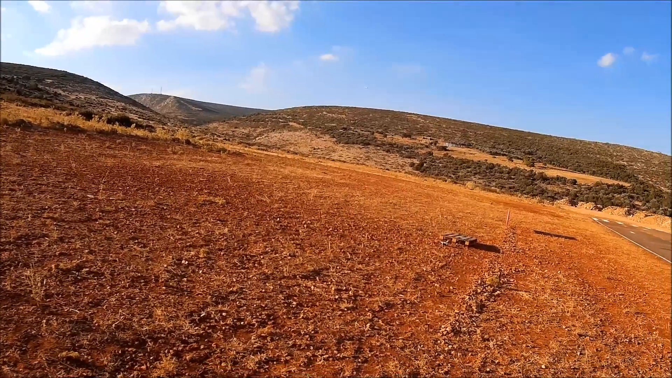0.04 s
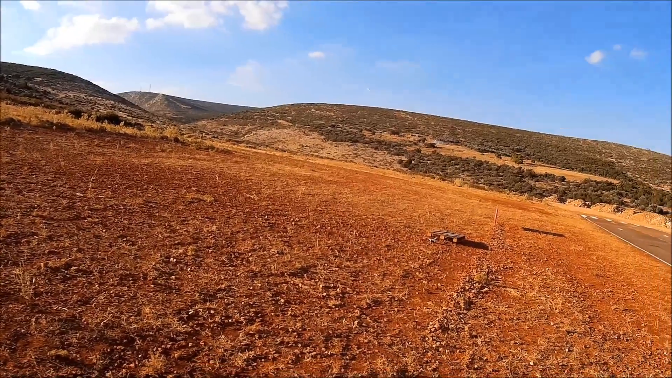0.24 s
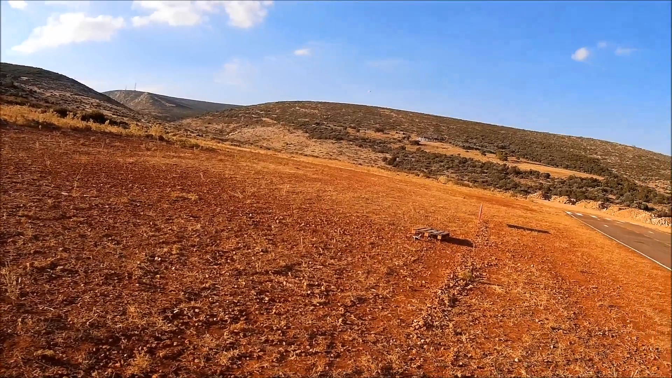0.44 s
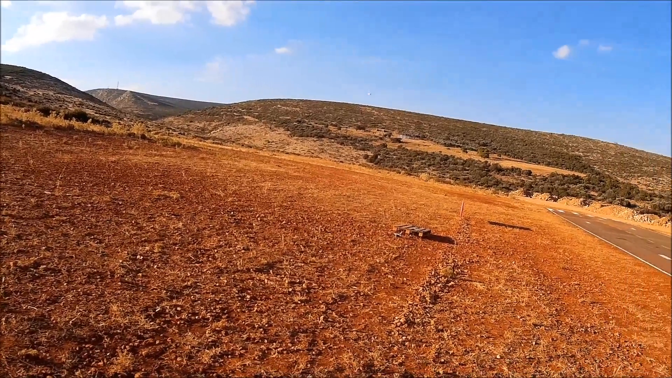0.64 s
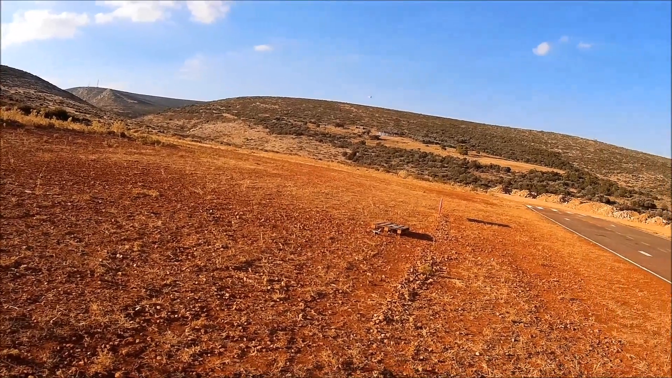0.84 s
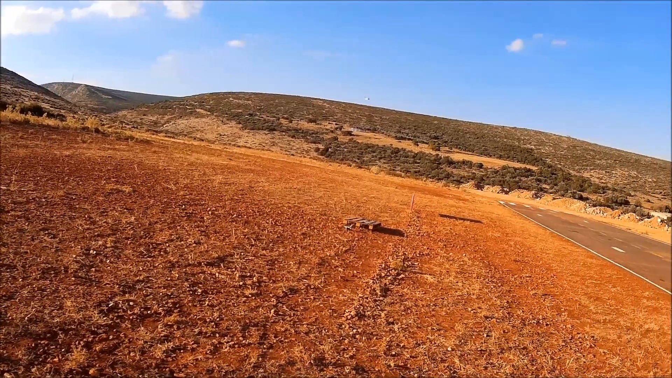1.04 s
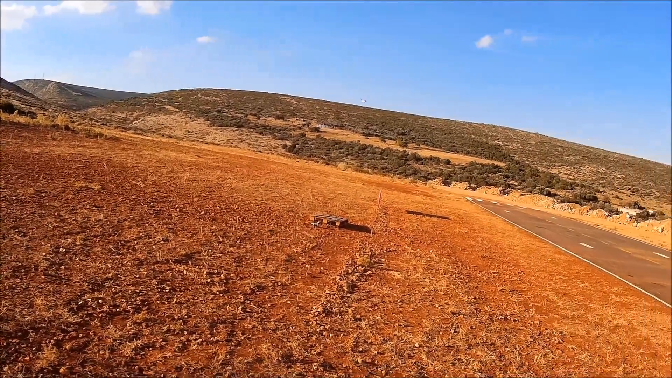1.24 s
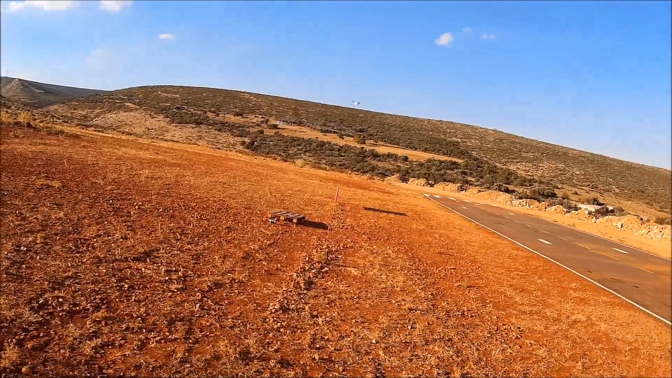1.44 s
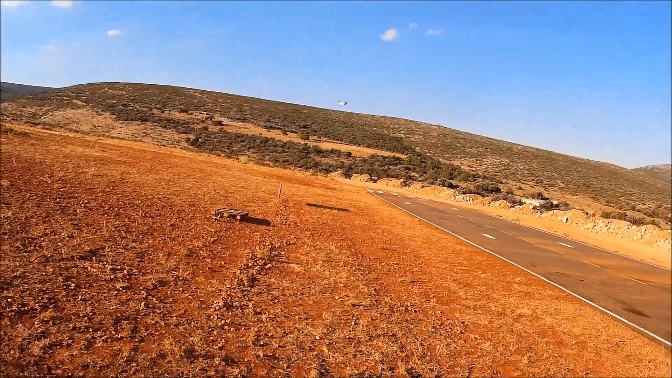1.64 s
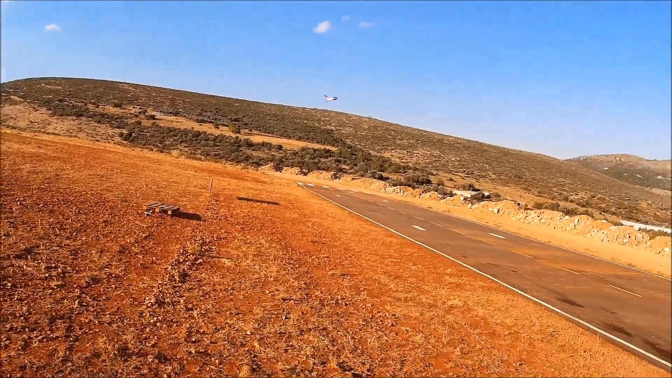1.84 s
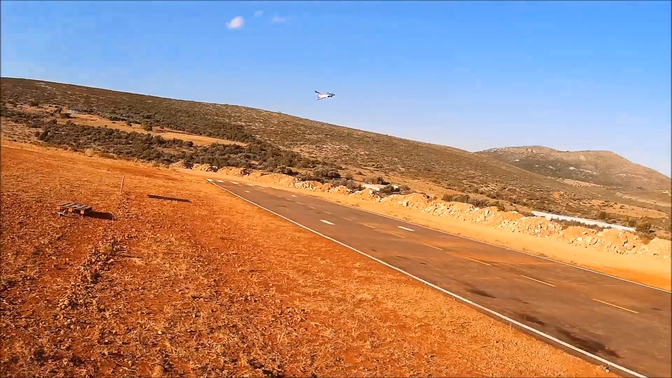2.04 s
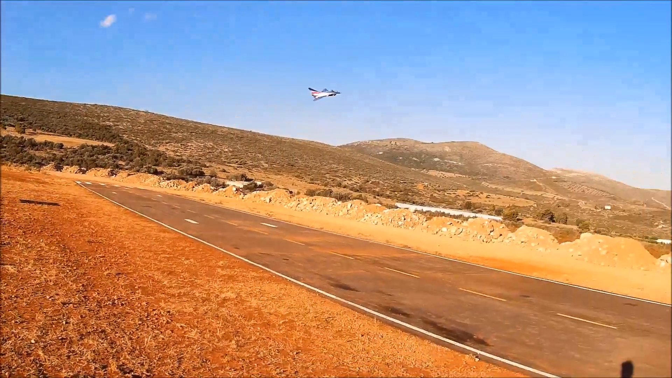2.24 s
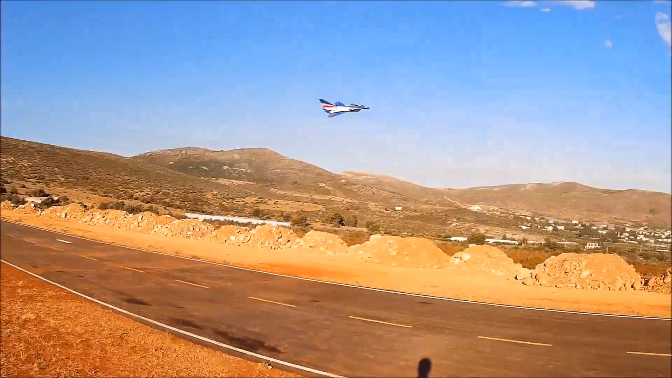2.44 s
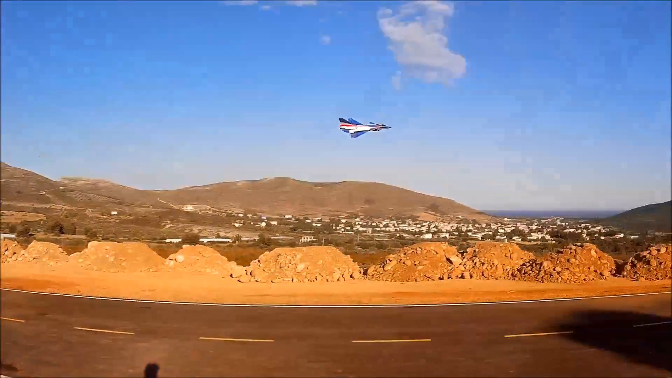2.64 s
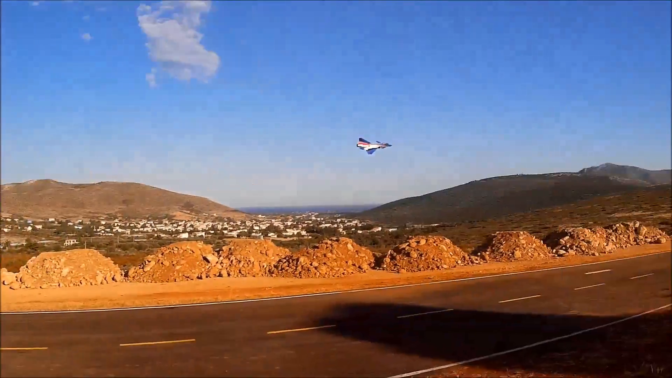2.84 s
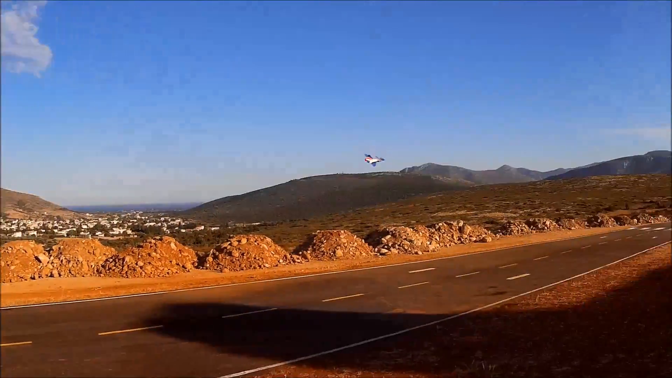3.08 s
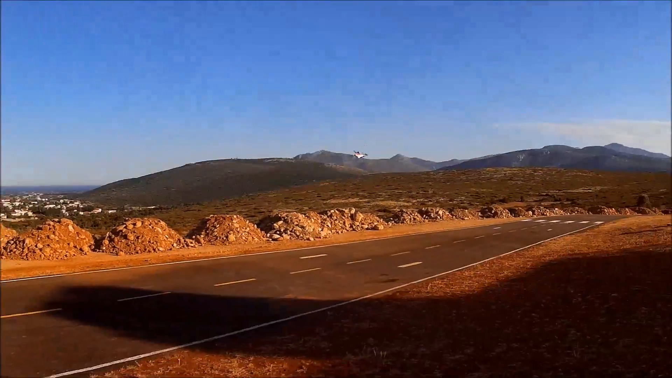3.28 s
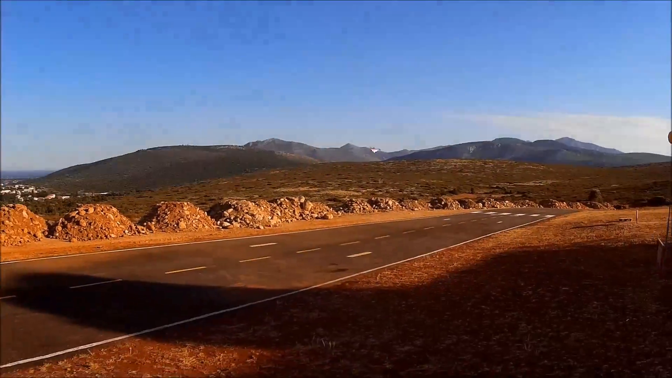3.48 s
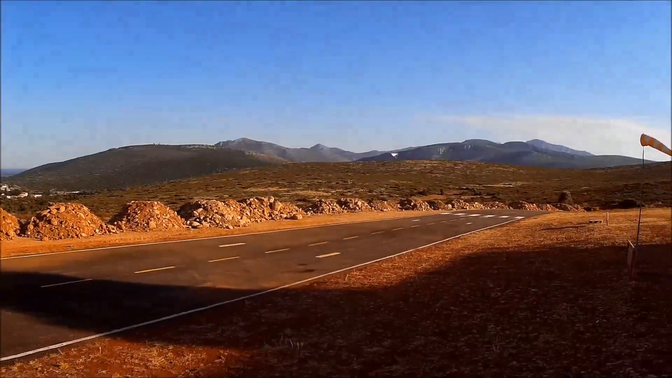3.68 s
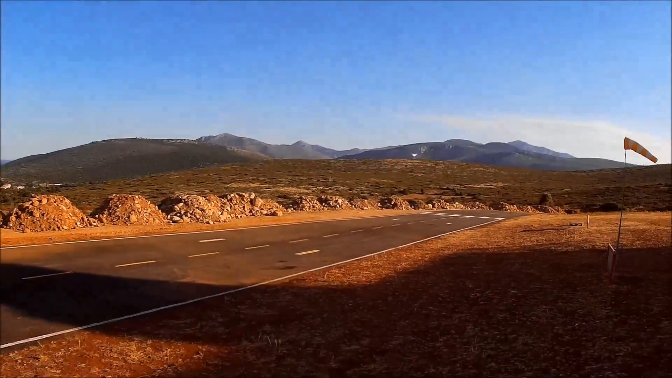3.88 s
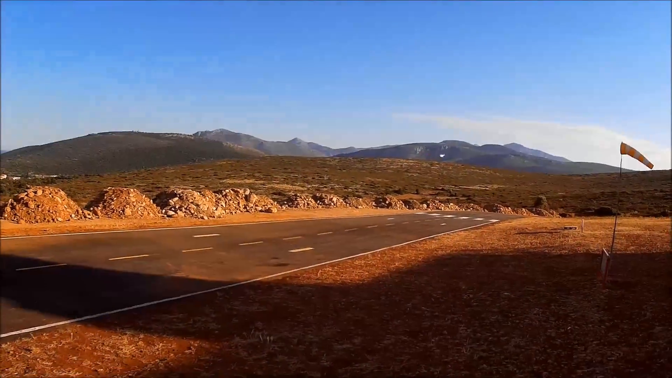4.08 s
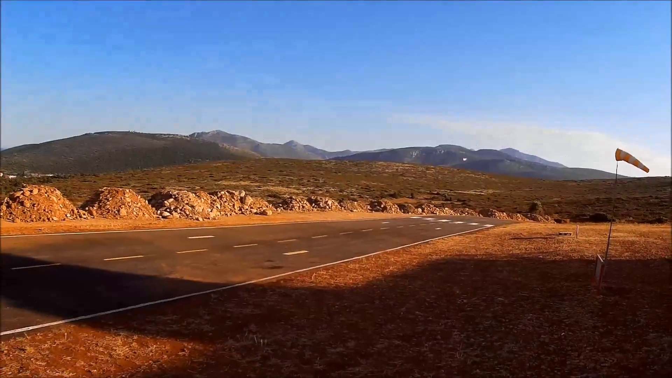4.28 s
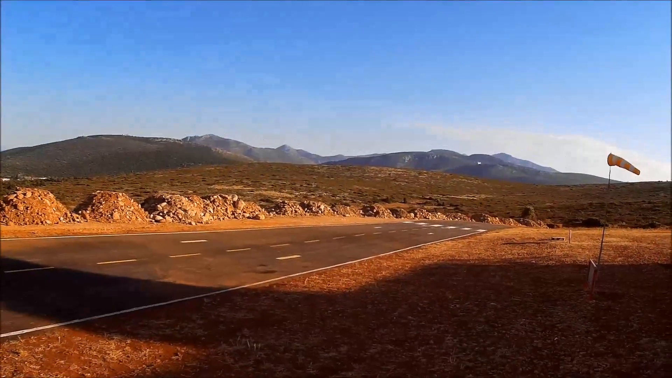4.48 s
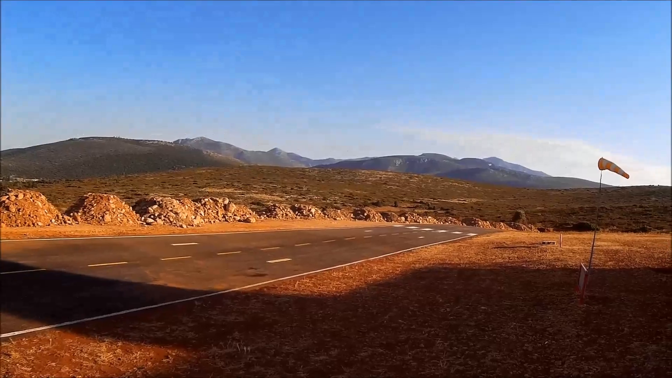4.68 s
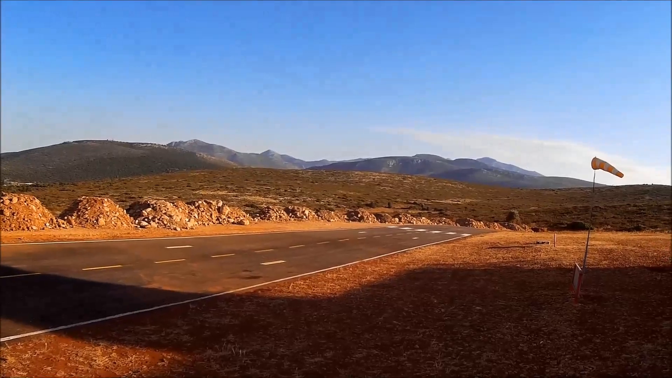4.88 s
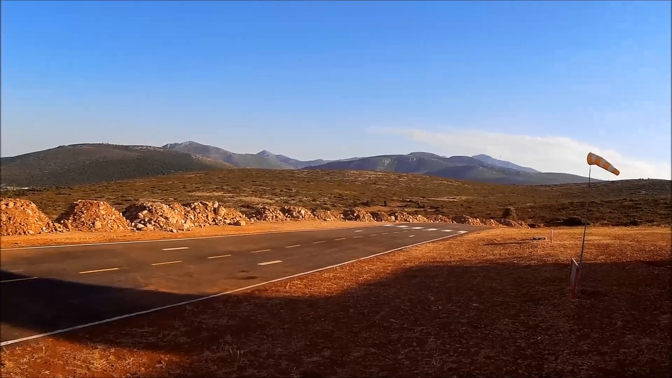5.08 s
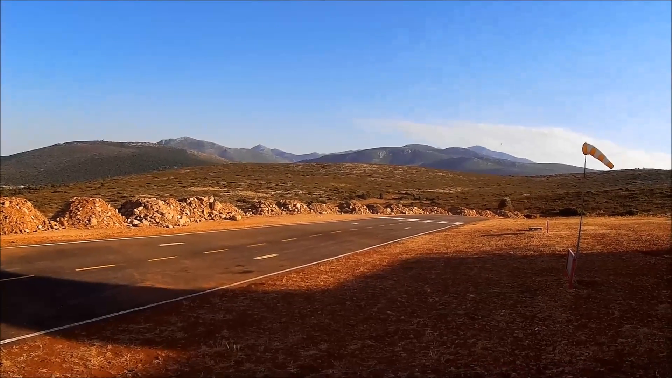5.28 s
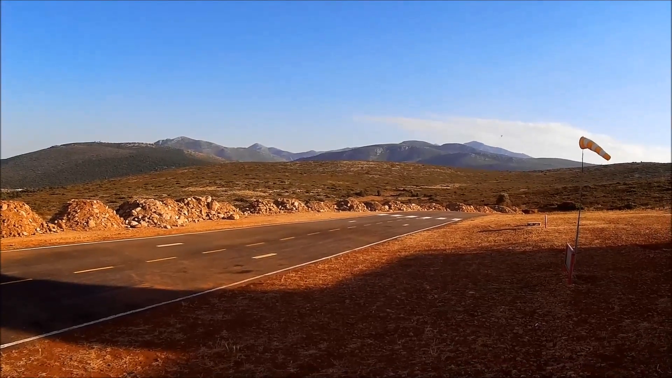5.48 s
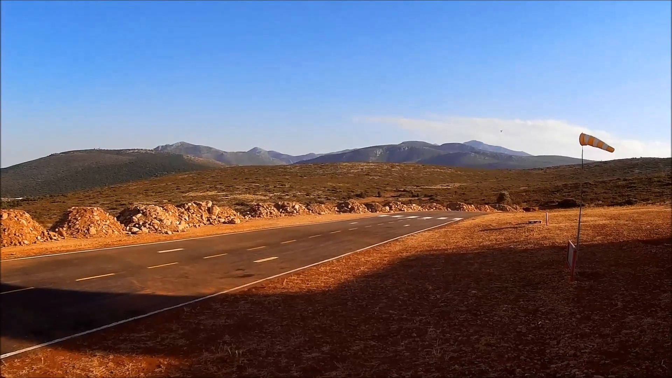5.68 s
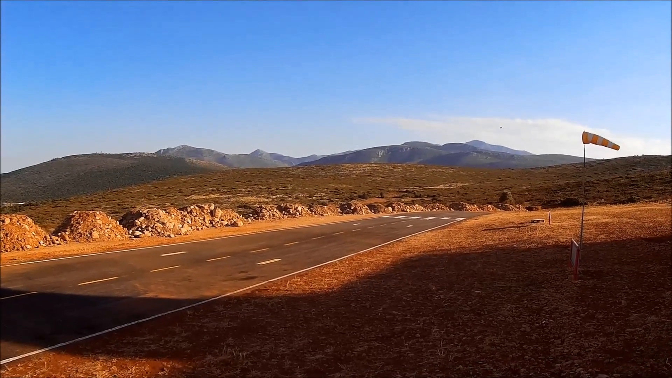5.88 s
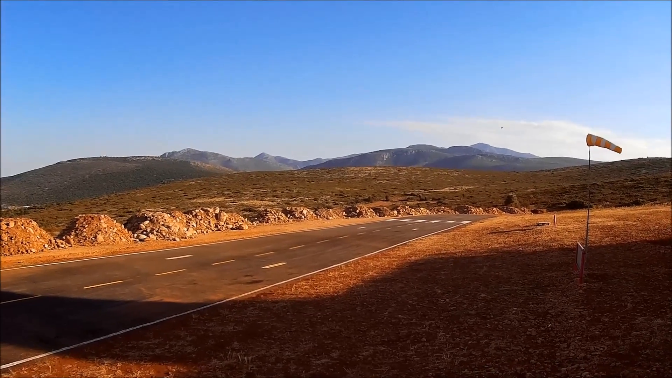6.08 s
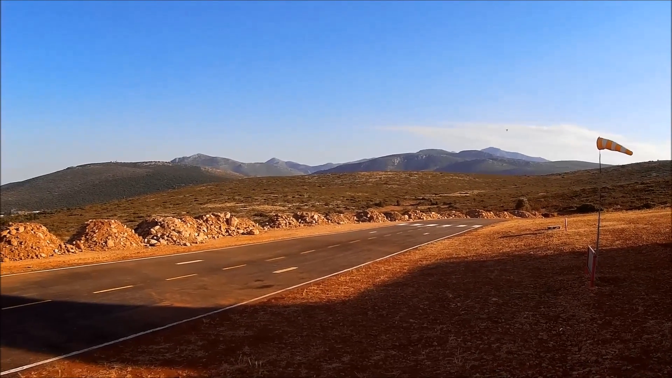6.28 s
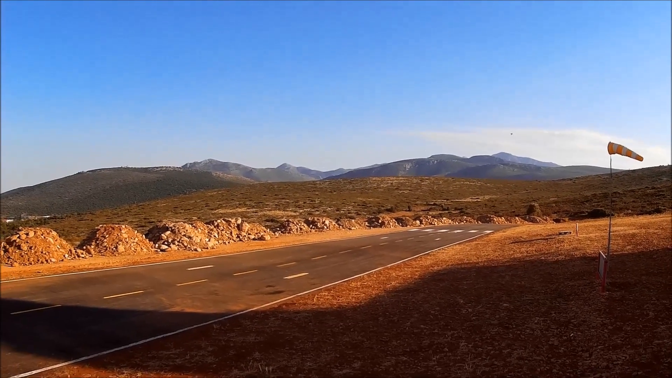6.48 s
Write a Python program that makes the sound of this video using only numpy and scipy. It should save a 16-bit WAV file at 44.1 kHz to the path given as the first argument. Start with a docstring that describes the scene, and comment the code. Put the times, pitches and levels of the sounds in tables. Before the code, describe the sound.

From the start, a model jet with an electric fan is heard approaching over an open airfield: a steady hum and high whine inside a wavering rush of air. The rush grows louder and brighter through the first two seconds. At about 2.6 seconds the jet passes close and low, at its loudest, with a hissing, sweeping whoosh, and the hum and whine drop quickly in pitch. From about 3 seconds it recedes, the treble falling away to leave a duller, throaty rush and a thin, lower whine that waver and are faint by the end, at about 6.5 seconds. Gusts of wind buffet the microphone with a low, uneven rumble, strongest from 2 to 3.4 seconds and returning more lightly afterwards. Small, soft thumps of wind come near 3.4 seconds and between 5.6 and 5.9 seconds. A faint, steady hiss lies underneath.

```python
"""A model jet with an electric fan in a duct makes one fast, low pass over an open airfield.
The spinning fan hums and whines, and its pitch falls as it goes by (the Doppler effect).
The churning exhaust air makes a rushing noise that grows louder and brighter as the jet nears.
An echo off the runway mixes with the jet's sound and gives it a sweeping whoosh.
Behind it, gusts of wind buffet the microphone over a faint, steady hiss."""
import sys
import numpy as np
from scipy import signal
from scipy.fft import rfft, irfft, next_fast_len
from scipy.io import wavfile
from scipy.ndimage import uniform_filter1d, map_coordinates

SR = 44100
rng = np.random.default_rng(int(sys.argv[2]) if len(sys.argv) > 2 else 0)


def output_pcm(signal):
    """Save a mono or channel-first signal as 16-bit PCM at the path in sys.argv[1].

    Samples are clipped to [-1, 1] before scaling.
    """
    pcm = np.clip(np.atleast_2d(signal).T, -1, 1) * 32767
    wavfile.write(sys.argv[1], SR, np.round(pcm).astype(np.int16))


N = 287708
TIME = np.arange(N) / SR
SOUND_M_PER_S = 343


def from_db(db):
    """Turns decibels into a factor to multiply a sound by."""
    return 10 ** (np.asarray(db) / 20)


def unit_level(x):
    """Scales a signal to an average (rms) size of 1."""
    return x / np.sqrt(np.mean(x ** 2) + 1e-20)


def look_up(rows, at):
    """Reads a table at the given times or angles, joining its rows with straight lines."""
    marks, *columns = np.transpose(rows)
    return [np.interp(at, marks, column) for column in columns]


def drift(rate):
    """A smooth random wobble of size about 1; a higher rate wobbles faster."""
    step, warm_up = 40, 2000
    pole = np.exp(-2 * np.pi * step * rate / SR)
    white = rng.standard_normal(N // step + warm_up + 2)
    slow = signal.lfilter([1], [1, -2 * pole, pole * pole], white)[warm_up:]
    return np.interp(np.arange(N) / step, np.arange(len(slow)), unit_level(slow))


def noise(spectrum, patchy_db=0.0, rate=1.0, bands=1):
    """Noise of size 1, shaped by a table from bass to treble; each band swells and fades on its own."""
    hz, db = np.transpose(spectrum)
    size = next_fast_len(N)
    log_hz, marks = np.log(np.arange(size // 2 + 1) * SR / size + 1e-9), np.log(hz)
    shape = from_db(np.interp(log_hz, marks, db, left=-200, right=-200))
    bins = rfft(rng.standard_normal(size)) * shape
    place = np.interp(log_hz, [marks[0], marks[-1]], [0, bands - 1])
    parts = (irfft(bins * np.maximum(1 - abs(place - k), 0), size)[:N] for k in range(bands))
    return unit_level(sum(part * from_db(patchy_db * drift(rate)) for part in parts))


# The tone of the quiet background: f/Hz, relative level/dB
STILL_AIR_SPECTRUM = [(30, -3), (200, -9.5), (600, -7), (1500, -13.5), (2100, -22), (2900, -23),
                      (4000, -25), (6000, -26), (7500, -31), (14000, -35.5), (16000, -31)]

def still_air(level_db=-53.5):
    """Still air and the microphone's own hiss make a faint, steady noise."""
    return from_db(level_db) * noise(STILL_AIR_SPECTRUM)


# Single hard puffs of wind: t/s, relative peak level/dB
PUFFS = [(3.334, -24), (3.381, -20), (5.3, -29), (5.602, -24), (5.642, -21), (5.673, -19), (5.686, -18),
         (5.787, -25), (5.845, -21.5), (6.429, -23.5)]

def puffs(typical_width_s=0.0013, gain_db=-10.0):
    """A swirl of air hitting the microphone gives one quick push and pull of pressure."""
    out = np.zeros(N)
    for start, peak_db in PUFFS:
        width_s = typical_width_s * from_db(2 * rng.standard_normal())
        offset = (TIME - start) / width_s - 1
        near = abs(offset) < 6
        out[near] += from_db(peak_db + gain_db) * offset[near] * np.exp((1 - offset[near] ** 2) / 2)
    return out


def gust(start, length, rise_s=0.045, fade_s=0.031):
    """The strength of one gust: it rises quickly, holds and dies away."""
    rise = np.clip((TIME - start) / rise_s + .5, 0, 1)
    return rise * np.exp(-np.maximum(TIME - start - length, 0) / fade_s)


# The tone of the wind's deep rumble and of its higher buffeting: f/Hz, relative level/dB
RUMBLE_SPECTRUM = [(12, -3.5), (25, -0.5), (45, -4), (80, -4), (120, -8), (220, -21)]
BUFFET_SPECTRUM = [(60, -21), (120, -1.5), (160, -0.5), (220, 0), (290, -4), (400, -9.5), (700, -28.5),
                   (1400, -22.5), (3000, -39)]
# The light breeze: t/s, rumble level/dB
BREEZE = [(0, -61), (1.2, -60), (1.4, -51), (4.7, -48), (5.05, -55), (6.52, -50.5)]
# The gusts: start t/s, length/s, rumble level/dB, buffet level/dB
GUSTS = [(0.202, 0.055, -53, -51), (1.274, 0.05, -45, -52), (1.432, 0.23, -43.5, -45),
         (1.72, 0.21, -47, -48), (1.994, 0.876, -40.5, -38), (2.203, 0.21, -35, -31.5),
         (2.692, .04, -31, -32), (2.845, 0.27, -42, -47.5), (3.186, 0.055, -38, -30.5),
         (3.3, .07, -34, -33.5), (4.216, 0.11, -41.5, -47), (4.432, .07, -38.5, -46),
         (4.85, 0.082, -53, -50.5), (5.182, 0.11, -41.5, -49), (5.6, .32, -45.5, -39),
         (5.974, 0.21, -45, -49), (6.27, 0.21, -46.5, -47)]

def wind():
    """The breeze and its gusts make lumpy, low noise as they blow across the microphone."""
    rumble_gain = from_db(look_up(BREEZE, TIME)[0])
    buffet_gain = rumble_gain * from_db(-11)
    for start, length, rumble_db, buffet_db in GUSTS:
        strength = gust(start, length)
        rumble_gain = np.hypot(rumble_gain, from_db(rumble_db) * strength)
        buffet_gain = np.hypot(buffet_gain, from_db(buffet_db) * strength)
    rumble = rumble_gain * noise(RUMBLE_SPECTRUM, patchy_db=2.5, rate=13.0)
    buffet = buffet_gain * noise(BUFFET_SPECTRUM, patchy_db=3.5, rate=25.0)
    return rumble + buffet


# The jet's shallow dive and climb
LOWEST_M, LOWEST_S, PULL_UP_M_PER_S2 = 5.95, 3.0, 2.66
# How much sound bounces back; rough ground scatters the treble: f/Hz, level/dB
GROUND_BOUNCE = [(450, -2.14), (1100, -6), (1900, -14.5), (2500, -8), (3600, -10.5), (5000, -9.5),
                 (6500, -28), (15000, -21)]

def ground_echo(sound, distance, mic_height_m=1.6):
    """The ground returns a late, duller copy. Its changing delay sweeps dips through the mix."""
    height = LOWEST_M + .5 * PULL_UP_M_PER_S2 * (TIME - LOWEST_S) ** 2
    delay_s = 2 * mic_height_m * height / distance / SOUND_M_PER_S
    hz, db = np.transpose(GROUND_BOUNCE)
    log_hz = np.log(np.arange(1, N // 2 + 2) * SR / N)
    dulled = irfft(rfft(sound) * from_db(np.interp(log_hz, np.log(hz), db)), N)
    return map_coordinates(dulled, [(TIME - delay_s) * SR], order=3)


SPEED_M_PER_S, CLOSEST_M, PASS_S = 43.37, 15.7, 2.63
MACH = SPEED_M_PER_S / SOUND_M_PER_S

def flight():
    """Distance (m) and angle (0 degrees nose-on, 180 tail-on) of the jet when the sound left it."""
    along = SPEED_M_PER_S * (TIME - PASS_S)
    distance = (np.sqrt(along ** 2 + (1 - MACH ** 2) * CLOSEST_M ** 2) - MACH * along) / (1 - MACH ** 2)
    return distance, np.degrees(np.arccos(MACH - along / distance))


# Moving air makes the far sound surge and fade: t/s, relative level/dB
AIR_FADING = [(0.03, -4), (0.23, 2.5), (0.33, -5.4), (0.45, 1.5), (0.73, -1), (0.87, 5.5), (1.13, 1.1),
              (1.73, 2.5), (1.79, 0), (2.01, 2), (2.61, -1.04), (2.93, 0.13), (3.63, 0.2), (3.67, -3),
              (4.19, -0.2), (4.79, -8), (5.01, 1), (5.17, -8.2), (5.63, -6.8), (5.73, -0.5), (5.85, -7),
              (6.21, -14), (6.31, -10), (6.47, -12)]

def path_db(distance, fading_share):
    """Level change on the way: sound weakens as it spreads out, and wavers in moving air."""
    fading_db = uniform_filter1d(look_up(AIR_FADING, TIME)[0], size=2646, mode="nearest")  # over 60 ms
    return 20 * np.log10(CLOSEST_M / distance) + fading_share * fading_db


# One row each for the exhaust's roar, rush, hiss and sizzle:
# base level/dB, loss in the air/(dB per m), boost straight ahead/dB, share of the fading
EXHAUST_PARTS = [(-26.5, 0.0671, 0.76, 0.71), (-25.5, 0.02, -1.4, 1.21), (-25.5, 0.08, 0.35, 0.87),
                 (-36, 0.11, -1.75, 1.1)]

def exhaust_levels(distance, angle):
    """Each part of the exhaust gets quieter with distance, and is louder either ahead or behind."""
    extra_m, ahead = distance - CLOSEST_M, np.cos(np.radians(angle))
    return [db + path_db(distance, share) - air_loss * extra_m + ahead_db * ahead
            for db, air_loss, ahead_db, share in EXHAUST_PARTS]


# The tone of each part of the rushing noise as heard at the microphone,
# including the microphone's own fixed treble peaks: f/Hz, relative level/dB
ROAR_SPECTRUM = [(120, -50), (300, -5), (550, -4.5), (700, -5), (900, 0), (1150, -0.5), (1400, -1),
                 (1650, 0), (1900, -6.5), (2200, -12.5), (2800, -47)]
RUSH_SPECTRUM = [(1700, -15.5), (2200, -12.5), (2700, -8.5), (3200, -6), (3600, -1.5), (3900, 0),
                 (4400, -9), (4800, -10), (5500, -50)]
HISS_SPECTRUM = [(4000, -17), (4500, -9), (4900, -5.5), (5400, 1), (5800, 1), (6200, -7.5), (6600, -22),
                 (7000, -32.5), (8000, -29)]
SIZZLE_SPECTRUM = [(6200, 3.5), (7000, -10.5), (7400, -7), (8000, 3), (8900, -10), (9700, 1), (10400, 2.5),
                   (11100, -14), (11900, -1.5), (12600, -4), (13400, -22), (14200, -12), (15200, -32),
                   (16000, -45)]

def exhaust(roar_db, rush_db, hiss_db, sizzle_db):
    """The noise of churning air, coloured by the microphone; swirls on the way make the treble shimmer."""
    swirls = drift(7.2)
    roar = from_db(roar_db) * noise(ROAR_SPECTRUM, patchy_db=0.93, rate=19.0, bands=8)
    rush = from_db(rush_db + .5 * swirls) * noise(RUSH_SPECTRUM, patchy_db=1.3, rate=15.0, bands=7)
    hiss = from_db(hiss_db + 1.08 * swirls) * noise(HISS_SPECTRUM, patchy_db=2.2, rate=6.8, bands=7)
    sizzle = from_db(sizzle_db + 1.5 * swirls) * noise(SIZZLE_SPECTRUM, patchy_db=1.5, rate=19, bands=7)
    return roar + rush + hiss + sizzle


def air_absorption(sound, distance, edge_hz=11200, closest_db=2.5, loss_db_per_m=0.06):
    """The highest treble is lifted up close; the air soaks it up as the distance grows."""
    treble = signal.sosfiltfilt(signal.butter(4, edge_hz, "high", fs=SR, output="sos"), sound)
    gain = from_db(closest_db - loss_db_per_m * (distance - CLOSEST_M))
    return sound + treble * (gain - 1)


# Bumps and dips heard at the microphone: angle/degrees, centre f/Hz, depth (negative is a bump)
PASSING_HOLLOW = [(16.6, 2500, -0.076), (48.6, 2120, -0.78), (78.5, 2100, -0.053), (104, 1880, 0.69),
                  (132, 2050, 0.69), (145, 2200, 0.42), (152.6, 2800, 0.35), (160, 2850, 0.13),
                  (169, 2200, -0.14), (167.8, 2000, 0.43)]  # a bump, then a hollow, as the jet passes
THROATY_ROAR = [(8, 1250, -0.83), (13, 1300, 0.071), (100, 1000, 0.18), (150, 650, -0.23),
                (164.7, 1020, -0.89), (171.2, 1180, -1.15), (170.3, 1300, 0.0032)]  # throaty in line with the duct, most of all behind

def tone_sweep(sound, angle):
    """Wide bumps and dips sweep through the rushing noise heard at the microphone as the jet passes."""
    for pattern, width_hz in [(PASSING_HOLLOW, 490), (THROATY_ROAR, 300)]:
        centre_hz, depth = look_up(pattern, angle)
        carrier = np.exp(2j * np.pi * np.cumsum(centre_hz) / SR)
        pole = np.exp(-np.pi * width_hz / SR)
        # slide the band down to 0 Hz, smooth away the rest, and slide it back up
        band = 2 * np.real(carrier * signal.lfilter([1 - pole], [1, -pole], sound / carrier))
        sound = sound - depth * band
    return sound


# The hum's level at each angle, with a brief dip just before the jet passes:
# angle/degrees, level/dB at the closest distance
HUM_LEVELS = [(7, -25.5), (9, -17), (16, -24.5), (36, -19), (51, -17.5), (65, -28.5), (85, -22.5),
              (112, -20.5), (133, -26), (160, -32), (174, -40)]
# The directions in which the whine is listed: angle/degrees
WHINE_ANGLES = [11, 45, 80, 115, 145, 164, 172]
# The whine's tones: multiple of the hum's pitch, then level/dB above noise_db at each of those angles
WHINE_OVERTONES = [(2, 0, 0.5, -8, -6, -13, -14, -11), (3, -17, -8, -8, 0.5, -10, -22, -19),
                   (4, -15, -16, 0, -4, -7, -14, -19), (11, -10, -19, -25, -25, -21, -2, -18),
                   (12, -6, -2, -12, -26, -22, -17, -8), (13, -14, -12, -26, -28, -27, -22, -23)]

def fan(noise_db, distance, angle, turns_per_s=393.5, wobble=0.00045):
    """The fan hums at its spin rate and whines at multiples of it; churning air roughens the whine."""
    doppler_hz = turns_per_s / (1 - MACH * np.cos(np.radians(angle)))
    phase = 2 * np.pi * np.cumsum(doppler_hz * (1 + wobble * drift(18.6))) / SR
    hum_db = look_up(HUM_LEVELS, angle)[0] + path_db(distance, fading_share=0.34)
    hum = from_db(hum_db + .5 * drift(28)) * np.sin(phase)
    roughness = .22 + .45 * np.sin(np.radians(angle)) ** 2  # roughest from the side
    whine = np.zeros(N)
    for multiple, *levels_db in WHINE_OVERTONES:
        turn = multiple * phase + rng.uniform(0, 2 * np.pi)
        rasp = drift(30) * np.sin(turn) + drift(30) * np.cos(turn)
        tone = (np.sin(turn) + roughness * rasp) / np.sqrt(1 + 2 * roughness ** 2)
        whine += from_db(noise_db + np.interp(angle, WHINE_ANGLES, levels_db)) * tone
    return np.sqrt(2) * hum, np.sqrt(2) * whine


def scene():
    """Still air and wind, with the ground echo and the passing jet on top."""
    distance, angle = flight()
    roar_db, rush_db, hiss_db, sizzle_db = exhaust_levels(distance, angle)
    hum, whine = fan((rush_db + hiss_db) / 2, distance, angle)
    airflow = air_absorption(exhaust(roar_db, rush_db, hiss_db, sizzle_db), distance)
    body = hum + tone_sweep(airflow, angle)
    echo = ground_echo(body + .3 * whine, distance)  # the duct aims the whine, so less hits the ground
    return (still_air() + wind() + puffs() + echo + body + whine)[None]


def record(dry, cutoff_hz=15650):
    """Cuts off the very highest treble steeply."""
    return signal.sosfilt(signal.ellip(12, .1, 90, cutoff_hz, fs=SR, output="sos"), dry)


dry = scene()
out = record(dry)
output_pcm(out)
```